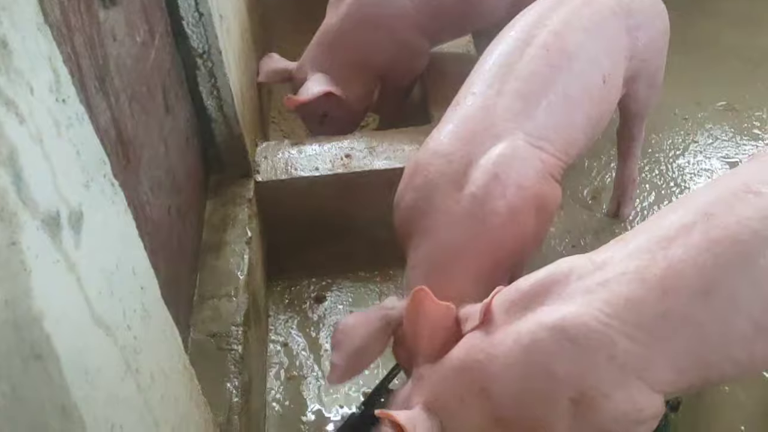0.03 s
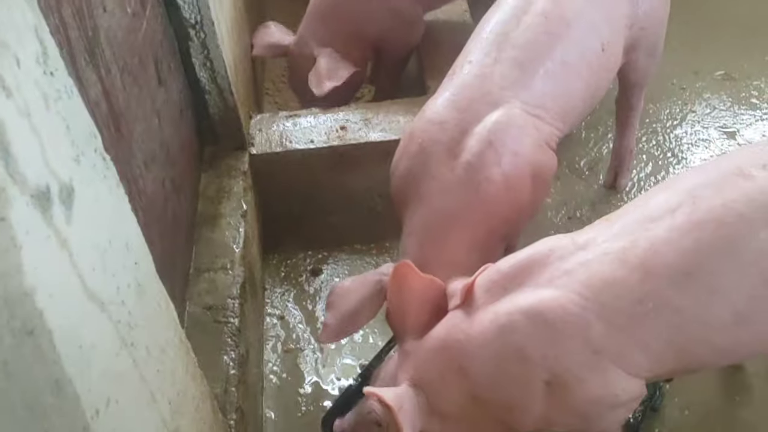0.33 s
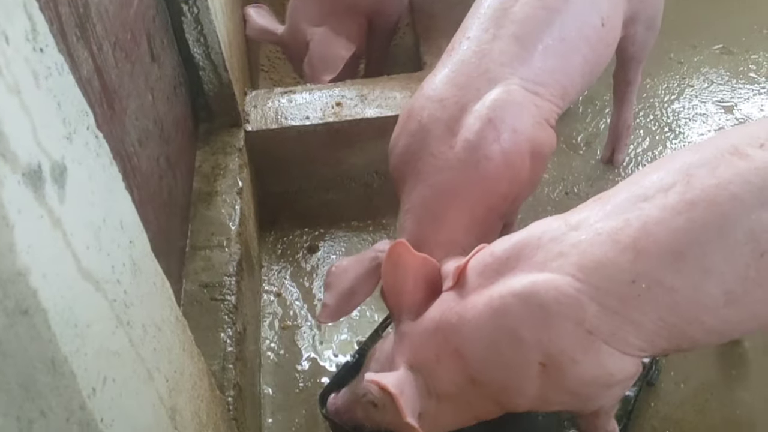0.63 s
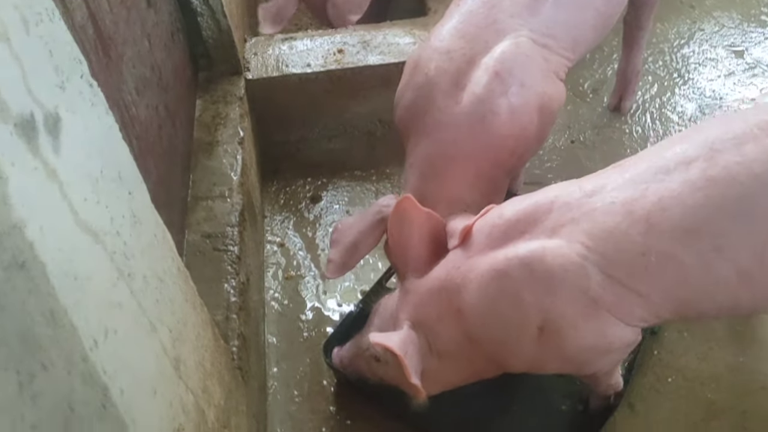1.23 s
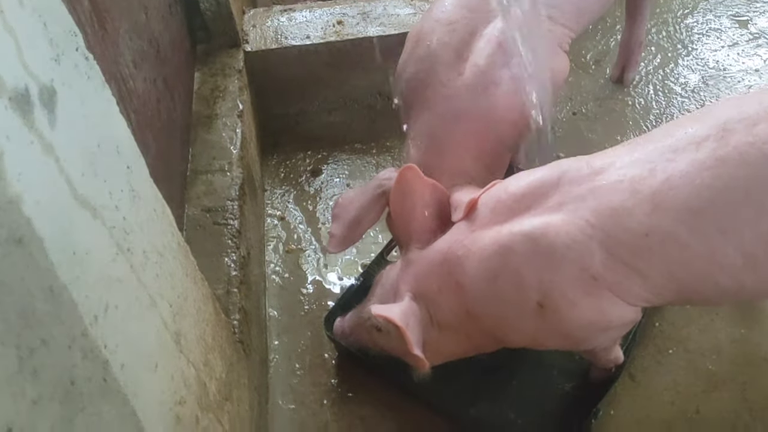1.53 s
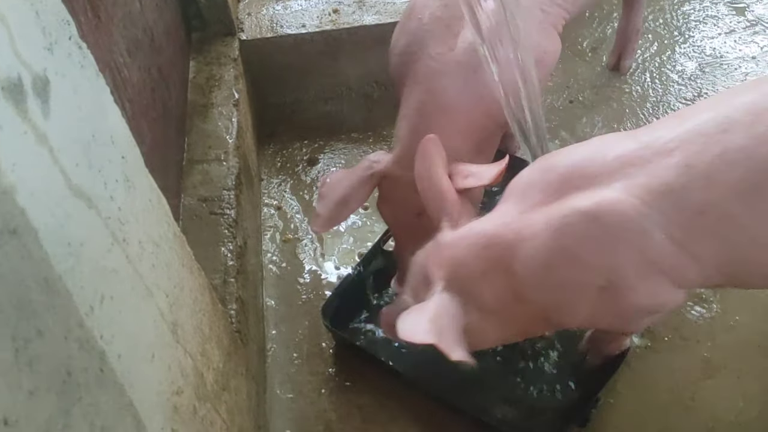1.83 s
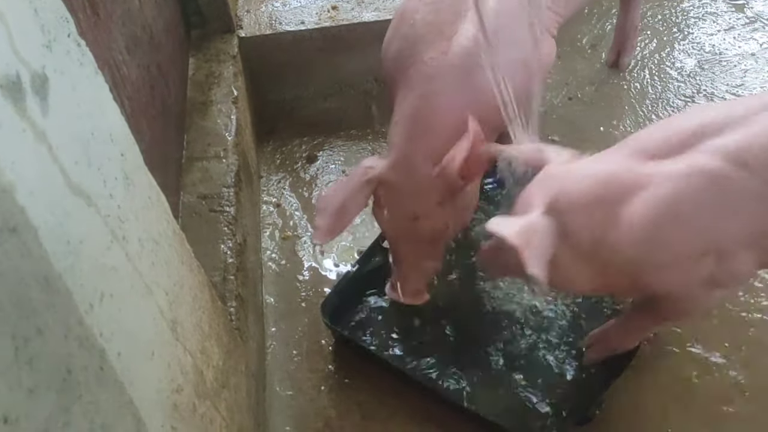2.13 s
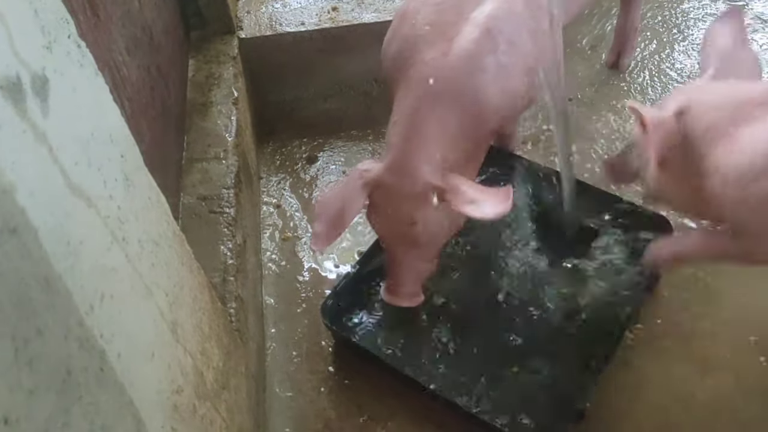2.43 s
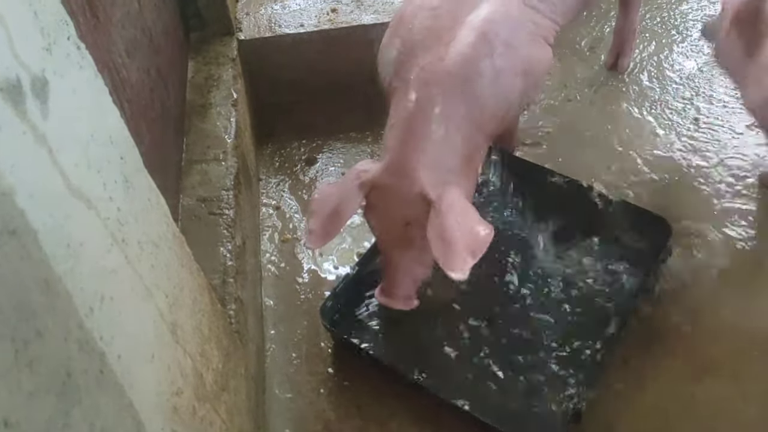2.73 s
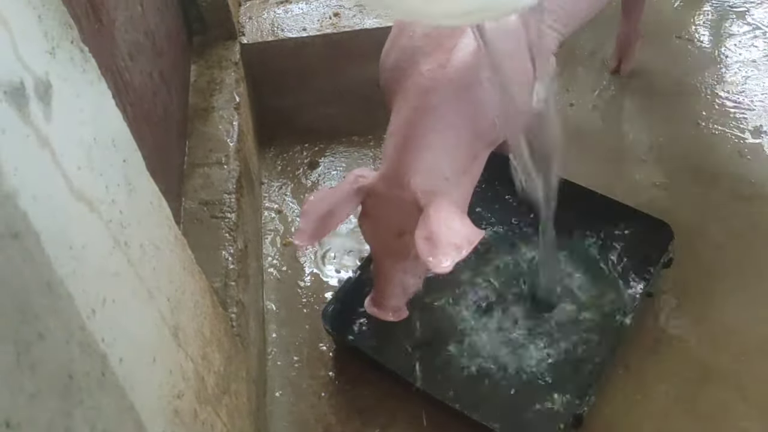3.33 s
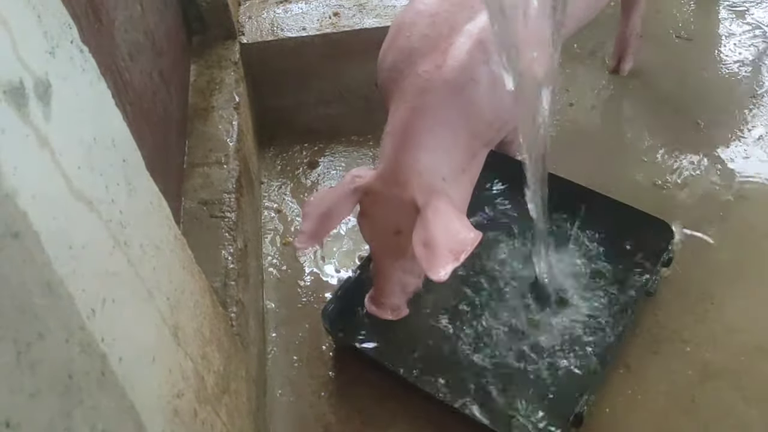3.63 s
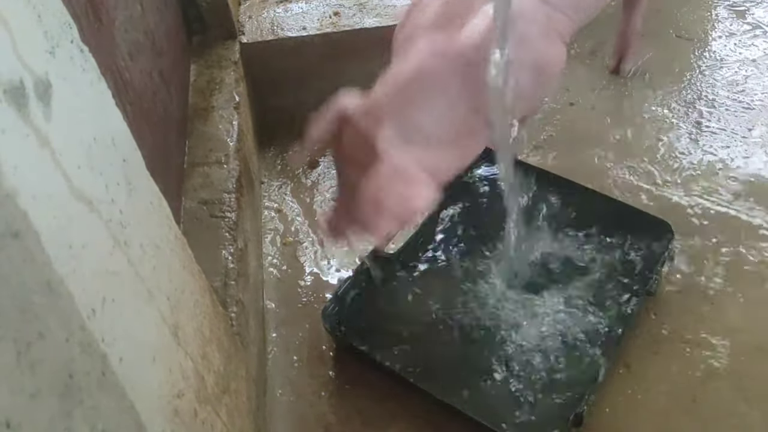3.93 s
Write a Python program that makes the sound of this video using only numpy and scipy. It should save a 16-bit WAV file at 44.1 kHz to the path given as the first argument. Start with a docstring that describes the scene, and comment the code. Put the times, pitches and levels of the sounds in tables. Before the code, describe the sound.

Water splashes close by as it is poured twice over pigs into a plastic tray. Before that, the pigs softly shuffle and slurp on the wet floor. The concrete pen adds a short echo and a faint low rumble.

```python
"""Water is poured twice from a bucket over two pigs into a plastic tray in a wet concrete pen.
First, over a low rumble, hum and hiss, one pig whines faintly; they shuffle and slurp; the tray thuds.
At about 1.3 s the first pour begins: spray crackles on backs and floor, small bubbles fizz,
lumps of water slap, and the stream gurgles as it digs into the tray.
It dies down near 2.8 s, and the second pour follows at once and runs to the end."""
import sys
import numpy as np
from scipy import signal
from scipy.fft import rfft, irfft, next_fast_len
from scipy.io import wavfile

SR = 44100
rng = np.random.default_rng(int(sys.argv[2]) if len(sys.argv) > 2 else 0)


def to_wav(s):
    """Save 16-bit WAV."""
    ch = np.atleast_2d(s).T  # columns
    pcm = np.round(np.clip(ch, -1, 1) * 32767)  # PCM
    wavfile.write(sys.argv[1], SR, pcm.astype(np.int16))


N = 176400
T = np.arange(N) / SR
MIC_LAG_S, TOP_HZ = 0.0004, 15750   # longest delay between left and right; upper edge of the treble
STREAM_SIDE, STREAM_SPREAD = 0.27, 0.44   # where the bubbles lie, from -1 left to 1 right


def from_db(db):
    """Turn decibels into a factor to multiply by."""
    return 10 ** (np.asarray(db) / 20)


def rms_one(x):
    """Scale a sound so that the mean of its channels has strength (rms) 1."""
    return x / np.sqrt(np.mean(np.atleast_2d(x).mean(0) ** 2) + 1e-20)


def fade(t, ring_s):
    """A fade that falls by 60 dB in the ring time."""
    return np.exp(-np.log(1000) * t / ring_s)


def gains(rows):
    """Turn each level column into a volume curve, silent outside the listed times."""
    times, *columns = np.transpose(rows)
    return np.array([from_db(np.interp(T, times, db, left=-120, right=-120)) for db in columns])


def add(out, start_s, sound):
    """Mix a sound in at a given time."""
    i = int(np.clip(start_s * SR, 0, N - 1))
    out[..., i:i + sound.shape[-1]] += sound[..., :N - i]


def keep(x, kind, hz, order=2):
    """Keep the "low", "high" or "band" part of a sound."""
    return signal.sosfilt(signal.butter(order, hz, kind, fs=SR, output="sos"), x + 1e-18)


def coloured(x, points):
    """Shape a sound's tone with a curve through (f/Hz, level/dB) points."""
    size = next_fast_len(N + 8192, True)
    hz, db = np.transpose(points)
    grid_hz = np.maximum(np.fft.rfftfreq(size, 1 / SR), 1)
    curve = from_db(np.interp(np.log(grid_hz), np.log(hz), db))
    # folding the cepstrum makes the filter ring only after a click, never before
    cepstrum = irfft(np.log(curve), size)
    cepstrum[1:size // 2] *= 2
    cepstrum[size // 2 + 1:] = 0
    return irfft(rfft(x, size) * np.exp(rfft(cepstrum)), size)[..., :N]


def drift(rate_hz):
    """A smooth random wobble of typical size 1."""
    step, warm_up = 40, 2000
    pole = np.exp(-2 * np.pi * step * rate_hz / SR)
    noise = rng.standard_normal(N // step + warm_up + 2)
    slow = signal.lfilter([1], [1, -2 * pole, pole * pole], noise)[warm_up:]
    return np.interp(np.arange(N) / step, np.arange(len(slow)), rms_one(slow))


def wide_noise(size):
    """Stereo noise: left and right are alike in the bass and unrelated in the treble."""
    mid, side = rng.standard_normal((2, size))
    side = keep(side, "high", hz=1360, order=1)
    return np.array([mid + side, mid - side])


def drops(per_s, spread_db):
    """Drops land as random clicks of uneven size, each from its own direction."""
    chance, size, where = rng.random((3, N))
    at = np.flatnonzero(chance < per_s / SR)
    strength = from_db(spread_db * np.minimum(-np.log(size + 1e-9), 5))
    clicks = (strength * rng.choice([-1, 1], N))[at]
    lag = np.round((2 * where[at] - 1) * MIC_LAG_S * SR).astype(int)
    out = np.zeros((2, N))
    out[0, at] = clicks
    np.add.at(out[1], np.clip(at + lag, 0, N - 1), clicks)
    return out


def burst(decay_s):
    """A sudden spatter of droplets: noise that dies away fast."""
    t = T[:SR // 8]
    return rng.standard_normal((2, len(t))) * np.exp(-t / decay_s)


def bubble(hz, ring_s, direction):
    """Trapped air rings with a fading, rising note that reaches the nearer side first."""
    rise = 0.23   # share of pitch gained during the ring time
    delay_s = MIC_LAG_S * np.maximum([[direction], [-direction]], 0)
    t = np.maximum(np.arange(int(ring_s * SR) + 30) / SR - delay_s, 0)
    note = np.sin(2 * np.pi * hz * t * (1 + rise * t / ring_s / 2))
    onset = 1 - np.exp(-2 * hz * t)
    return note * onset * fade(t, ring_s)


def bubbles(per_s, low_hz, high_hz, cycles, spread_db):
    """A swarm of bubbles; the short, high ones carry as much energy as the long, low ones."""
    out = np.zeros((2, N))
    for when, pitch, size, life, where, sign in rng.random((int(per_s * N / SR), 6)):
        hz = low_hz * (high_hz / low_hz) ** pitch
        strength = from_db(spread_db * min(-np.log(size + 1e-9), 3)) * np.sqrt(hz)
        ring_s = cycles * (.5 + life) / hz
        direction = STREAM_SIDE + STREAM_SPREAD * (2 * where - 1)
        add(out, when * N / SR, np.sign(sign - .5) * strength * bubble(hz, ring_s, direction))
    return rms_one(out)


# tone of the rumble: f/Hz, level/dB
RUMBLE_TONE = [(22, -22), (42, 2), (75, -4), (135, -1), (175, -12.5), (600, -48)]
def rumble():
    """A steady, deep rumble."""
    return from_db(-55) * rms_one(coloured(wide_noise(N), RUMBLE_TONE))


# tone of the hiss: f/Hz, level/dB
HISS_TONE = [(100, -12), (220, -13.5), (330, -11.5), (550, -10.5), (800, -20.5), (1700, -31), (3000, -17),
             (6100, -23), (6800, -15), (7600, -22), (8500, -14), (9400, -24.5), (12000, -32.5),
             (15500, -29.5)]
def hiss():
    """A faint, even hiss from all around."""
    noise = keep(wide_noise(N), "high", hz=100)
    return from_db(-54.5) * rms_one(coloured(noise, HISS_TONE))


def hum(hz=99.6):
    """A wavering hum, probably a motor some way off."""
    return from_db(-62.5 + 1.5 * drift(6.3)) * np.sqrt(2) * np.sin(2 * np.pi * hz * T)


def pen_echo(x, wander_s=0.2):
    """Concrete walls echo; the treble dies first, and the pattern changes as the splash wanders."""
    t, hop = T[:SR // 2], int(wander_s * SR)
    onset = np.clip((t - .003) / 0.0034, 0, 1)
    out = np.zeros((2, N))
    for centre in range(0, N + hop, hop):
        noise = wide_noise(len(t)) * onset
        low = keep(noise, "low", hz=2500, order=1)
        tail = low * fade(t, ring_s=0.2) + (noise - low) * fade(t, ring_s=0.12)
        tail /= np.sqrt(np.sum(tail ** 2) / 2)
        at = np.arange(max(centre - hop, 0), min(centre + hop, N))
        part = x[:, at] * np.cos(np.pi / 2 * (at - centre) / hop)   # blends into its neighbours
        add(out, at[0] / SR, signal.fftconvolve(part, tail, axes=1))
    return out


def whine(length_s=0.19, hz=551.5, waver=0.041):
    """A thin, unsteady whine from a pig further off, right at the start."""
    arch = np.sqrt(np.maximum(np.sin(np.pi * np.clip(T / length_s, 0, 1)), 0))
    volume = arch * from_db(-48 + 2 * drift(60))
    pitch_hz = hz * (1 + waver * drift(65))
    return volume * np.sin(2 * np.pi * np.cumsum(pitch_hz) / SR)


# wet snouts slurp and squeak: t/s, length/s, f/Hz, width/Hz, level/dB
SNOUT_SLURPS = [(.012, 0.06, 4300, 112, -58), (0.251, 0.1, 2200, 1300, -52), (0.407, 0.06, 1960, 1000, -54),
                (0.653, 0.077, 1150, 260, -53), (0.966, 0.1, 4050, 380, -61),
                (1.116, 0.018, 1470, 400, -55.5), (1.154, .1, 2700, 700, -56.5),
                (1.261, 0.1, 3590, 170, -50.5)]
def slurps(clicks_per_s=900, sag=0.022):
    """Air and water sucked through a narrow gap: a crackly note that swells, fades and sags in pitch."""
    out = np.zeros((2, N))
    for start_s, length_s, hz, width_hz, db in SNOUT_SLURPS:
        progress = np.linspace(0, 1, int(length_s * SR))
        size = len(progress)
        crackle = wide_noise(size) * (rng.random(size) < clicks_per_s / SR)
        flutter = rms_one(keep(crackle, "low", width_hz / 2))
        pitch_hz = hz * (1 - sag * (progress - .5))
        note = np.sqrt(2) * np.sin(2 * np.pi * np.cumsum(pitch_hz) / SR)
        swell = np.sin(np.pi * np.sqrt(progress))
        add(out, start_s, from_db(db) * swell * flutter * note)
    return out


# the tray's own notes: f/Hz, level/dB, ring time/s
TRAY_NOTES = [(279.4, -3, 0.34), (359.8, -3, 0.3), (480, -11, 0.11), (555, 0, 0.062), (635, -5.5, 0.095)]
def tray(force):
    """The plastic tray rings with a few low notes whenever it is hit."""
    out = 0
    for hz, db, ring_s in TRAY_NOTES:
        decay, angle = fade(1 / SR, ring_s), 2 * np.pi * hz / SR   # per sample
        feedback = [1, -2 * decay * np.cos(angle), decay * decay]
        out = out + from_db(db) * signal.lfilter([0, np.sin(angle)], feedback, force + 1e-18)
    return out


# low thuds on the tray: t/s, level/dB
TRAY_THUDS = [(0.176, -46), (0.576, -48), (1.17, -51.5), (1.289, -53), (1.77, -40), (2.646, -35),
              (3.842, -44)]
def thuds():
    """Low thuds, from bumps or falling water, set the tray ringing."""
    force = np.zeros(N)
    for start_s, db in TRAY_THUDS:
        add(force, start_s, from_db([db]))
    return tray(force)


# tone of the wet floor: f/Hz, level/dB
FLOOR_TONE = [(150, -31), (300, -3.5), (550, -22), (750, -12.5), (1100, -8), (2000, -7.5), (7000, -10.5),
              (9000, -9.5), (12000, -18), (15500, -21)]
# how loud the shuffling is before the first pour: t/s, level/dB
SHUFFLE_LEVELS = [(0.0, -57.5), (0.285, -50.5), (0.548, -56), (0.566, -69), (0.652, -56), (0.782, -56),
                  (0.79, -46.5), (0.98, -63.5), (1.34, -61)]
# hooves and snouts meet the floor: t/s, level/dB
FLOOR_STEPS = [(0.138, -32), (0.167, -31), (0.79, -24.5)]
def shuffling():
    """Pigs move on the wet floor, making crackle, tiny bubbles and a few splashy steps."""
    volume, = gains(SHUFFLE_LEVELS)
    clicks = drops(per_s=1400, spread_db=1.6) * from_db(2.1 * drift(27))
    crackle = from_db(1) * volume * rms_one(coloured(clicks, FLOOR_TONE))
    froth = bubbles(per_s=170, low_hz=595, high_hz=5700, cycles=24, spread_db=2.5)
    froth *= from_db(-51) * volume / volume.max()
    steps = np.zeros((2, N))
    for start_s, db in FLOOR_STEPS:
        add(steps, start_s, from_db(db) * burst(decay_s=0.015))
    return crackle + froth + coloured(steps, FLOOR_TONE)


# large pockets of air: t/s, f/Hz, level/dB, ring time/s
AIR_POCKETS = [(1.413, 981, -34.5, 0.18), (1.765, 135, -31, 0.17), (2.624, 590, -38, 0.035),
               (2.651, 595, -21.5, 0.027), (2.916, 825, -29.5, 0.073), (2.938, 466, -30, 0.059),
               (3.100, 564, -19.5, 0.023), (3.151, 335, -24, 0.046), (3.178, 317, -25, 0.098),
               (3.206, 2510, -22, 0.031), (3.300, 1930, -20, 0.031), (3.378, 897, -26, .045),
               (3.485, 974, -30, 0.14), (3.806, 928, -29.5, 0.085), (3.833, 440, -24, 0.029),
               (3.843, 288, -27.5, 0.076)]
def plops():
    """Falling water traps pockets of air, and each rings as one big bubble."""
    out = np.zeros((2, N))
    for start_s, hz, db, ring_s in AIR_POCKETS:
        add(out, start_s, from_db(db) * bubble(hz, ring_s, STREAM_SIDE))
    return out


def splat(decay_s, low_hz, high_hz):
    """A spatter between two pitches, scaled to start at about strength 1."""
    sound = keep(burst(decay_s), "band", [low_hz, high_hz])
    return sound / np.sqrt(np.sum(sound ** 2) / (decay_s * SR))


# drops and lumps of water land: t/s, level/dB, f/Hz (middle of the splat)
WATER_SLAPS = [(.632, -28, 7560), (0.791, -26, 13000), (.796, -22.5, 6950), (1.355, -12, 10900),
               (1.363, -23, 1770), (1.378, -18.5, 1800), (1.83, -20, 1620), (2.057, -6, 7600),
               (2.109, -8, 7700), (2.18, -27, 3960), (2.492, -9.5, 7200), (2.569, -12, 6500),
               (2.646, -17, 2140), (2.648, -11.5, 7350), (2.800, -23, 12000), (2.815, -17, 7900),
               (2.842, -12.5, 7900), (2.850, -19, 1960), (2.884, -10, 8900), (2.892, -10.5, 4630),
               (2.914, -11.5, 4500), (2.9642, -11.5, 9800), (3.054, -10, 4900), (3.074, -13.5, 1580),
               (3.204, -8.5, 2680), (3.468, -17, 1750), (3.653, -10, 8800), (3.782, -7.5, 8000),
               (3.835, -12, 7000), (3.844, -6.5, 5300), (3.888, -10, 8900), (3.917, -9.5, 7600),
               (3.941, -8, 8900), (3.961, -5, 8500)]
def slaps(width_ratio=1.17):
    """Each lump of water lands with a bright snap and a splat around its own pitch."""
    out = np.zeros((2, N))
    for start_s, db, hz in WATER_SLAPS:
        decay_s = 0.003 * np.sqrt(4960 / hz)   # lower splats last longer
        body = from_db(-8.5) * splat(decay_s, hz / width_ratio, hz * width_ratio)
        snap = from_db(-12) * splat(decay_s=0.0017, low_hz=3500, high_hz=TOP_HZ)
        add(out, start_s, from_db(db) * (body + snap))
    return out


# tone of the churning under the stream: f/Hz, level/dB
CHURN_TONE = [(130, -13.5), (220, -15), (290, -10), (450, -5), (600, 11), (780, -9.5), (2500, -43)]
def gurgle():
    """The stream digs into the water, makes big bubbles, churns and drums on the tray."""
    glugs = bubbles(per_s=480, low_hz=298.5, high_hz=704, cycles=24, spread_db=3)
    churn = rms_one(coloured(drops(per_s=900, spread_db=1.1), CHURN_TONE))
    drumming = rms_one(tray(drops(per_s=400, spread_db=4)[0]))
    return from_db(-4) * glugs + from_db(-6) * churn + from_db(-9.5) * drumming


# tone of sloshing water: f/Hz, level/dB
SLOSH_TONE = [(400, -17.5), (620, -4.5), (800, -2), (1000, -0.5), (1200, -4.5), (1800, 3), (2500, -8),
              (4000, 0), (9000, -42)]
def fizz():
    """Small bubbles ring while sheets of water break with a slosh."""
    swarm = bubbles(per_s=600, low_hz=904, high_hz=3460, cycles=32, spread_db=5)
    slosh = rms_one(coloured(drops(per_s=900, spread_db=2), SLOSH_TONE))
    return from_db(-5.5) * swarm + from_db(-4.5) * slosh


# borders between the pitch bands, one band for each size of drop: f/Hz
DROP_BANDS = [700, 2200, 3300, 4700, 6500, 8800, 11800, 16000]
# tone of the spray: f/Hz, level/dB
SPRAY_TONE = [(700, -23), (1800, -5.5), (3200, -4), (5000, -3.5), (7300, 2.5), (9300, 0), (11700, -7.5),
              (15500, -5)]
def spray(clumps):
    """Drops of each size tick on backs and floor in their own flurries; the tiniest bubbles tinkle."""
    ticks = 0
    for edges_hz in zip(DROP_BANDS, DROP_BANDS[1:]):
        flurries = drops(per_s=2600, spread_db=2.5) * from_db(2.5 * drift(44))
        ticks = ticks + keep(flurries, "band", edges_hz)
    crackle = rms_one(coloured(ticks * from_db(1.6 * clumps), SPRAY_TONE))
    tinkle = bubbles(per_s=300, low_hz=2610, high_hz=8530, cycles=75, spread_db=3)
    return crackle + from_db(-9) * tinkle


# one list for each pour: t/s, spray level/dB, fizz level/dB, gurgle level/dB
POUR_LEVELS = [
    [(1.345, -48, -79, -70), (1.363, -33, -40, -64), (1.491, -30, -38.5, -43.5), (1.625, -30, -37, -54),
     (1.765, -33, -35, -41), (1.927, -32, -40.5, -47), (2.077, -28.5, -38, -54.5), (2.43, -30.5, -35, -40),
     (2.577, -38.5, -44.5, -55), (2.597, -41.5, -49, -78), (2.625, -37.5, -48, -41.5),
     (2.653, -37, -44.5, -63), (2.725, -52, -50.5, -55), (2.77, -52, -67, -64)],
    [(2.775, -62, -71, -59), (2.836, -40, -70, -71), (2.846, -32.5, -51, -49), (2.869, -34, -48, -51),
     (2.893, -32.5, -38.5, -57), (2.947, -35, -39, -42), (2.985, -31, -37.5, -41.5),
     (3.197, -33.5, -35.5, -36), (3.207, -30.5, -32, -48), (3.221, -33.5, -36, -36),
     (3.537, -32, -35, -42.5), (3.947, -29.5, -39, -40.5), (4.0, -47, -58, -44.5)],
]
def pouring():
    """Two pours of high spray, middle fizz and low gurgle; spray and fizz flicker together."""
    spray_volume, fizz_volume, gurgle_volume = sum(gains(pour) for pour in POUR_LEVELS)
    clumps = drift(56)
    fizz_volume *= from_db(1.2 * clumps)
    return spray_volume * spray(clumps) + fizz_volume * fizz() + gurgle_volume * gurgle()


def scene():
    """Water, pigs and tray echo in the pen, over a hiss, a rumble and a hum."""
    water = pouring() + slaps() + plops()
    pigs = shuffling() + slurps() + whine()
    near = water + pigs + thuds()
    in_pen = near + from_db(-6) * pen_echo(near)
    return from_db(-1.59) * in_pen + hiss() + rumble() + hum()


# how much louder the left microphone is than the right: f/Hz, level/dB
LEFT_OVER_RIGHT = [(400, 0.5), (800, 0), (1050, 2), (1350, -2), (1750, -3.5), (2700, -1), (3800, 1.5),
                   (5000, -1), (6700, -4), (8200, -2), (9500, 5.5), (11500, -0.5), (13000, 2),
                   (15000, -7.5)]
def record(dry):
    """Each microphone has its own tone, and the highest treble is cut off."""
    left = coloured(dry[0], [(hz, db / 2) for hz, db in LEFT_OVER_RIGHT])
    right = coloured(dry[1], [(hz, -db / 2) for hz, db in LEFT_OVER_RIGHT])
    treble_cut = signal.ellip(12, .1, 80, TOP_HZ, fs=SR, output="sos")
    return signal.sosfilt(treble_cut, np.array([left, right]))


dry = scene()
out = record(dry)
to_wav(out)
```